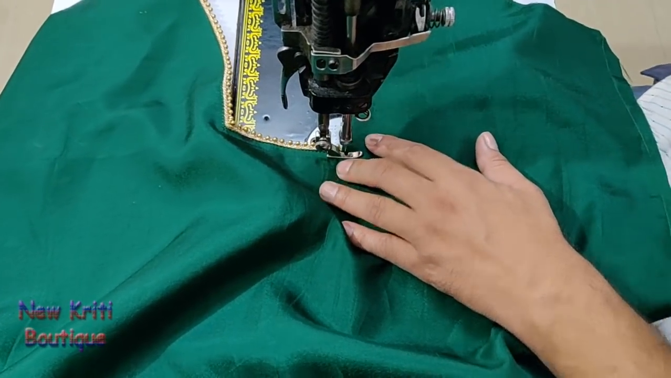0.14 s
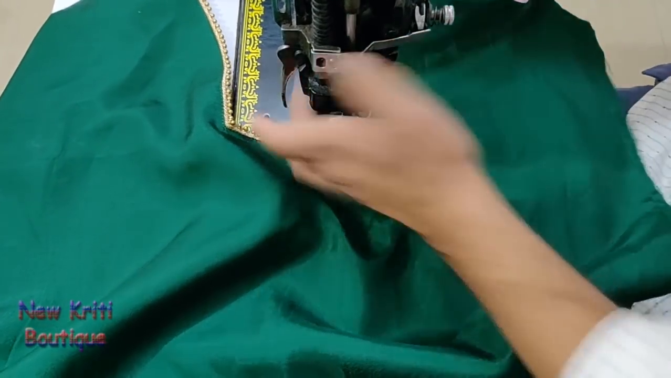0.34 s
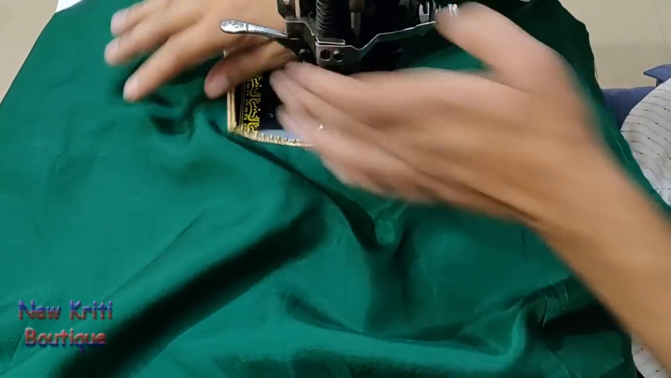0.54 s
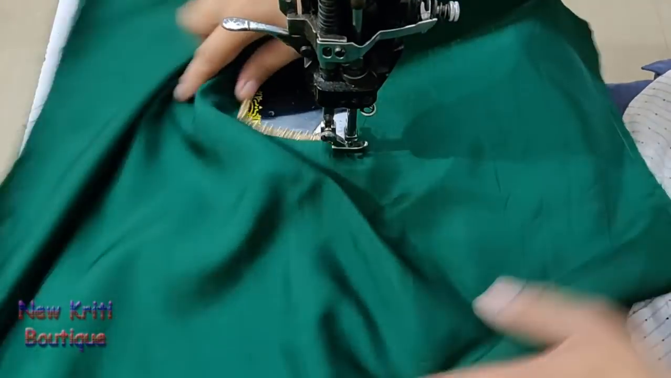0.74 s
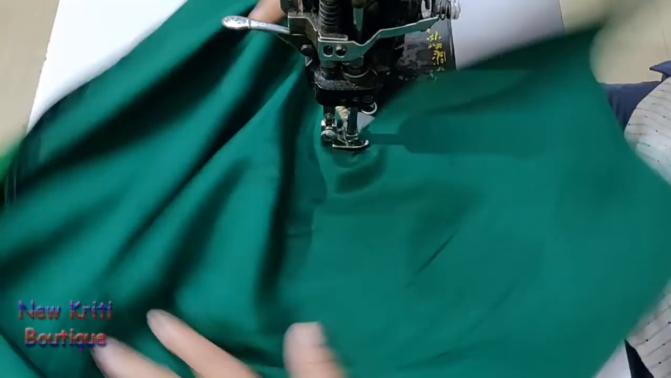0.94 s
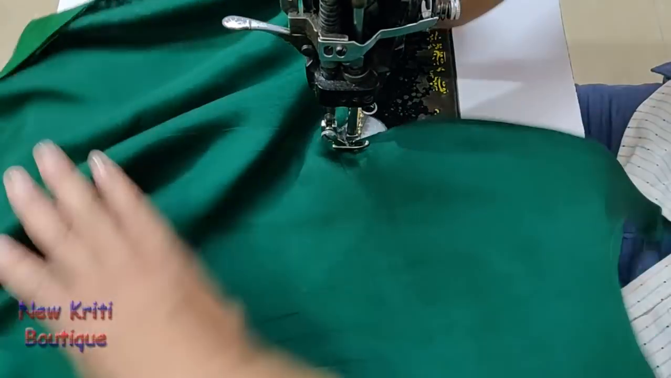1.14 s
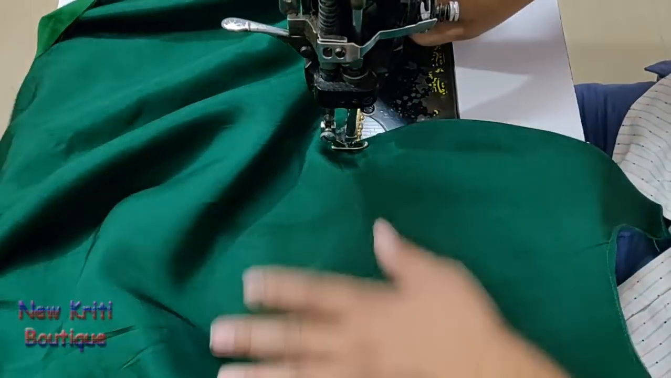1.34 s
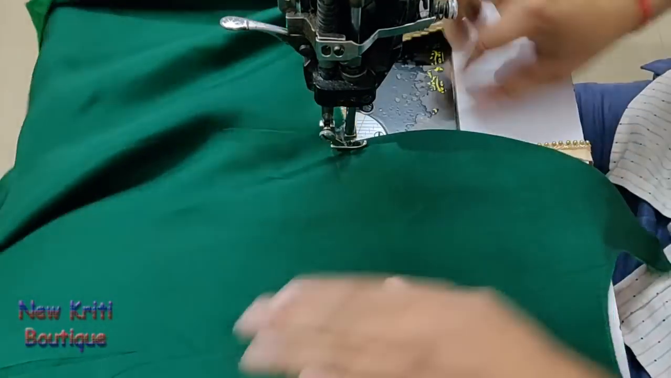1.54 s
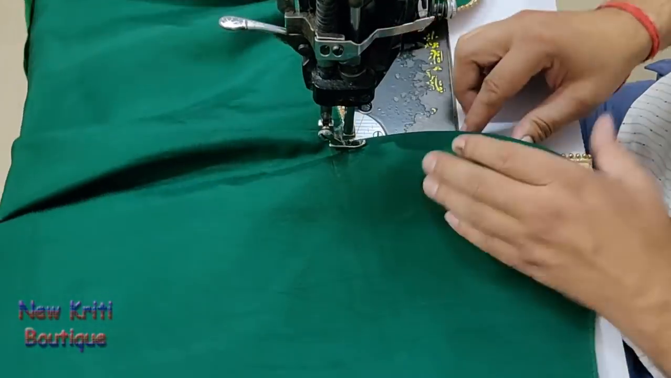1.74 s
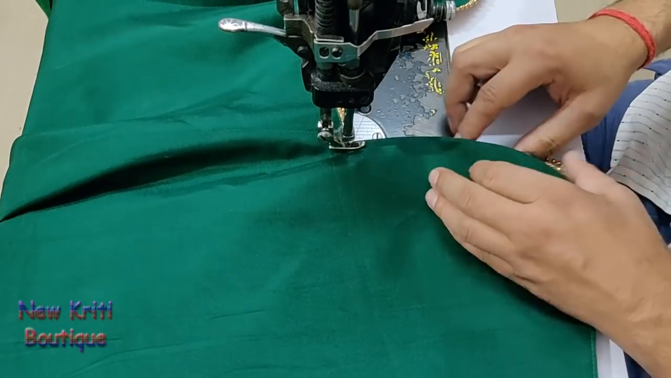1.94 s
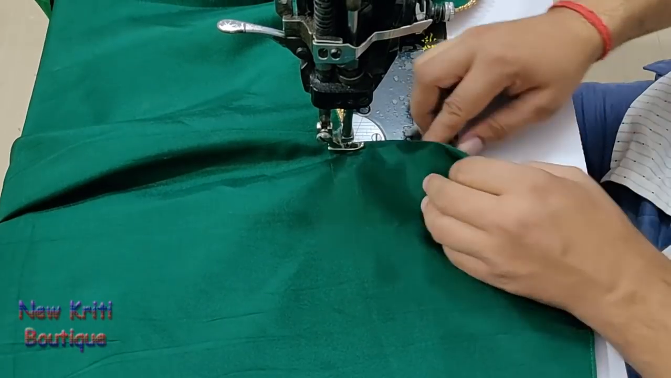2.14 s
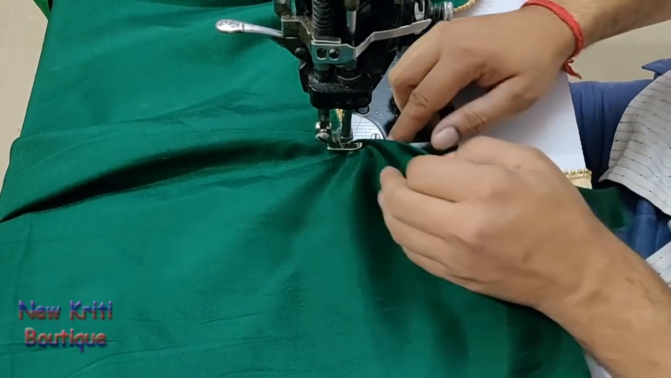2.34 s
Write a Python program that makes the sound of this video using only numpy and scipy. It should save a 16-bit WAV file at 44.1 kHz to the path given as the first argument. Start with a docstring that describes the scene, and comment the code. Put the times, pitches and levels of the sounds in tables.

```python
"""Sewing machine, cloth and hands

A sewing machine on a wooden table in a small room clacks: three steel strikes in quick succession.
Each strike is a noise crack and thud plus decaying sines for table, iron head and bump, and a room tail.
Hands bump table and machine (dulled noise bursts), slide the cloth (swelling noise) and move parts that
rub (narrow-band noise), click (bursts with a ping) and squeak (wavering sines). Faint room noise below."""
import sys
import numpy as np
from scipy import signal
from scipy.fft import rfft, irfft
from scipy.io import wavfile
from scipy.ndimage import uniform_filter1d

SR = 44100
rng = np.random.default_rng(int(sys.argv[2]) if len(sys.argv) > 2 else 0)


def persist_wave(psi):
    """Save psi, clipped to +-1, as 16-bit WAV."""
    counts = np.round(np.clip(psi, -1, 1) * 32767).astype(np.int16)
    wavfile.write(sys.argv[1], SR, np.atleast_2d(counts).T)


N = 110250
TIME_S = np.arange(N) / SR
BAND_EDGES_HZ = np.geomspace(30, 17000, 29)   # about third-octave

# Quiet room spectrum: freq_hz, density_db_per_hz
FLOOR_SPECTRUM = [(30, 13), (60, -25), (110, 5), (170, -2), (300, 0.5), (550, -11.5), (1000, -13.5),
                  (2000, -19.5), (4000, -25), (7000, -25), (11000, -26.5), (15000, -28)]
FLOOR_DB = -56.5
# Room decay: freq_hz, t60_s
ROOM_T60 = [(80, 0.53), (210, 0.96), (560, .44), (1470, 0.4), (3900, 0.27), (10000, 0.26), (16000, 0.15)]
ROOM_BUILD_S = 0.0024
# Left-right correlation of noise: freq_hz, correlation (no unit)
EAR_LIKENESS = [(25, -0.23), (80, 1), (330, 0.82), (700, 0.56), (1400, -0.19), (2800, 0.083), (6000, -.1),
                (14000, -0.02)]
PAN_CORNER_HZ = 7000

# Knocks: start_s, burst_db, hardness_cutoff_hz, table_ring_db, bass_cut_hz, room_db. Hands make all but the
# first, a faint blow of unknown source right at the start.
KNOCKS = [(0.001, -48, 596, -29.5, 176, -47), (0.5574, -29.5, 565, -11.5, 187, -37.5),
          (1.186, -40, 2950, -45, 99, -41.5), (1.1904, -29.5, 1620, -20, 59, -45),
          (1.194, -32.5, 3300, -18.5, 61, -32.5), (1.4009, -34, 1030, -16, 176, -32),
          (1.478, -54, 1500, -24, 160, -41.5), (1.638, -47, 420, -25, 169, -47),
          (2.401, -46.5, 810, -34, 300, -50)]
# Knock before the soft contact dulls it: freq_hz, density_db_per_hz
KNOCK_SPECTRUM = [(45, -40), (85, 9.5), (130, 8), (300, 7.5), (600, 3.5), (1000, 2), (2000, -1),
                  (4000, -11.5), (7000, 3.5), (15000, -12)]
KNOCK_T60_S = 0.042
# Wooden table modes: freq_hz, level_db, t60_s
TABLE_MODES = [(86, -40, .55), (182, -26, .56), (222, -32, .45), (295, -21, .38), (325, -23, .3),
               (350, -27, .28), (384.5, -22, .33), (442, -30, .42), (507, -29, .4), (554, -29, .45),
               (607, -26, .45)]

# Mechanism strikes: start_s, crack_db, thud_db, table_ring_db, iron_ring_db, room_db, pan_left_minus_right_db
CLACKS = [(0.1884, -52, -42.5, -16.5, -18, -35.5, -9), (0.2037, -18, -13, -1, -11, -24.5, -8),
          (0.2375, -15.5, -24, 1, 5, -16, -8)]
# Steel crack: freq_hz, density_db_per_hz
CRACK_SPECTRUM = [(100, -38), (500, -13.5), (1300, 9), (2500, -3.5), (4200, -6), (7000, -3), (9500, -9.5),
                  (12000, -9.5), (14500, 0), (17000, -7)]
# Thud: freq_hz, density_db_per_hz
THUD_SPECTRUM = [(25, -21), (45, -27), (60, -12), (85, -7), (125, -17), (200, -8), (350, 0), (650, -4),
                 (900, -26), (1300, -9), (2000, -13), (4500, -30.5), (7000, -24), (12000, -62)]
# Room answer to a clack: freq_hz, density_db_per_hz
CLACK_ROOM_SPECTRUM = [(45, -41), (130, -10.5), (200, -11.5), (340, -1), (560, -14.5), (850, -14),
                       (1350, -10), (2200, -16.5), (3500, -17.5), (7000, -20), (9000, -22.5),
                       (12000, -29.5), (14500, -16), (17000, -29)]
CRACK_T60_S, THUD_T60_S = 0.012, 0.18
# Iron head modes: freq_hz, level_db, t60_s
IRON_MODES = [(1042, -38, .3), (1108, -38, .25), (1301, -36, .3), (1332, -34, .3), (1394, -33, .33),
              (1712, -40, .24), (1898, -38, .24), (1927, -40, .24), (2990, -43, .18)]
# Heavy head rocking on the table: freq_hz, level_re_thud_db, t60_s
BUMP_MODES = [(77.4, -14.5, 0.3)]

# Cloth slides over the machine bed: fastest_s, rise_s, fall_s, level_db
SLIDES = [(0.64, 0.26, 0.19, -48.5), (0.901, 0.067, 0.24, -58), (1.378, 0.19, 0.27, -52),
          (1.902, 0.044, 0.097, -50), (2.161, 0.027, 0.029, -51)]
# Cloth hiss: freq_hz, density_db_per_hz
CLOTH_SPECTRUM = [(60, 5), (200, 17), (500, 16.5), (900, 7), (1800, 6.5), (3000, 1), (5800, 0), (7000, 7),
                  (8200, -3), (10000, -9), (12000, -5.5), (14500, 24), (17000, -63)]
CLOTH_GRAIN_DB, CLOTH_GRAINS_PER_S = 1, 120

# Moving parts rub: loudest_s, rise_s, fall_s, level_db, centre_hz, width_hz
RUBS = [(0.438, 0.02, 0.049, -44, 89, 20), (0.945, 0.0093, .02, -56.5, 860, 290),
        (1.08, .06, .07, -55, 135.3, 23), (1.24, 0.037, 0.093, -46.5, 86.3, 12),
        (1.432, 0.02, 0.11, -54.5, 82.6, 17), (1.46, 0.12, 0.16, -53.5, 970, 890),
        (1.5, 0.074, .07, -51, 803, 35), (1.83, 0.016, 0.037, -54.5, 276, 150)]

# Small steel clicks: start_s, click_db, ping_db, ping_hz, room_db, pan_left_minus_right_db
TICKS = [(0.4205, -58, -46, 6700, -61, -8), (1.196, -52.5, -51, 6400, -53, -3),
         (1.4023, -58, -50, 5360, -67, -7), (1.515, -38.5, -40, 6350, -38, -5),
         (1.6153, -54.5, -42.5, 8400, -58, -10), (1.7703, -58, -43, 7250, -52, -6),
         (2.0238, -52, -51, 7800, -48, -5), (2.131, -54.5, -64, 8100, -52, -6),
         (2.147, -62, -64, 7500, -61, 3), (2.439, -61.5, -64, 4200, -58.5, 0)]
# Steel click: freq_hz, density_db_per_hz
TICK_SPECTRUM = [(200, -30), (1200, -2.5), (3000, -2), (5500, -5), (6900, 5), (9200, -5), (10500, -1),
                 (12300, -5.5), (14500, 3), (17000, -15)]
TICK_T60_S, PING_T60_S = 0.0084, 0.02

# Metal-on-metal squeaks: loudest_s, rise_s, level_db, pitch_hz, t60_s
SQUEAKS = [(1.467, 0.02, -48.5, 2223, 0.84), (1.91, 0.017, -61, 2470, 0.13)]
SQUEAK_RISE_HZ_PER_S = 430
SQUEAK_WAVER_HZ, SQUEAK_WAVERS_PER_S, SQUEAK_FLUTTER_DB = 60, 220, 3

PEAK_LIMIT, CUTOFF_HZ = 0.69, 15900


def from_db(db):
    """Decibels to gain."""
    return 10 ** (np.asarray(db) / 20)


def at_hz(points, hz):
    """Interpolate a table on a log-frequency axis."""
    table_hz, value = np.transpose(points)
    return np.interp(np.log(hz), np.log(table_hz), value)


def decay(t60_s, length_s):
    """Exponential envelope, 60 dB down at t60_s."""
    return np.exp(-np.log(1000) * TIME_S[:int(length_s * SR)] / t60_s) + 1e-12


def swell(peak_s, rise_s, fall_s):
    """Gaussian movement with separate rise and fall widths, 1 at peak_s."""
    width_s = np.where(TIME_S < peak_s, rise_s, fall_s)
    return np.exp(-.5 * ((TIME_S - peak_s) / width_s) ** 2)


def wobble(rate_per_s):
    """Random values, rate_per_s of them a second, joined by straight lines."""
    return np.interp(TIME_S * rate_per_s, np.arange(N), rng.standard_normal(N))


def filtered(x, hz, kind, order=2):
    """Butterworth filter."""
    corner_hz = np.clip(hz, 10, .48 * SR)
    return signal.sosfilt(signal.butter(order, corner_hz, kind, fs=SR, output="sos"), x)


def blow_level(x):
    """Scale a stereo blow to the energy of 10 ms at rms 1."""
    return x * np.sqrt(2 * SR / 100 / np.sum(x ** 2))


def panned(x, left_minus_right_db):
    """Weight the treble between the ears; bass stays central."""
    ear_db = [[left_minus_right_db / 2], [-left_minus_right_db / 2]]
    treble = filtered(x, PAN_CORNER_HZ, "high", order=1)
    return x + treble * (from_db(ear_db) - 1)


def add(out, start_s, x):
    """Mix x into out from start_s."""
    start = max(int(start_s * SR), 0)
    out[:, start:start + x.shape[-1]] += x[..., :N - start]


def band(envelope, low_hz, high_hz):
    """One band of enveloped stereo noise, rms 1, with the ear correlation of its centre."""
    pair = filtered(rng.standard_normal((2, len(envelope))) * envelope, [low_hz, high_hz], "band")
    mid, side = pair / np.sqrt(np.mean(pair ** 2, axis=1, keepdims=True))
    alike = np.clip(at_hz(EAR_LIKENESS, np.sqrt(low_hz * high_hz)), -.99, .99)
    return np.sqrt((1 + alike) / 2) * mid + np.sqrt((1 - alike) / 2) * side * [[1], [-1]]


def coloured(spectrum, envelope_at):
    """Sum of noise bands, each under the envelope for its frequency; rms 1."""
    out = 0
    for low_hz, high_hz in zip(BAND_EDGES_HZ, BAND_EDGES_HZ[1:]):
        centre_hz = np.sqrt(low_hz * high_hz)
        gain = from_db(at_hz(spectrum, centre_hz)) * np.sqrt(high_hz - low_hz)
        out = out + gain * band(envelope_at(centre_hz), low_hz, high_hz)
    return out / np.sqrt(np.mean(out ** 2))


def steady(hz):
    """Flat envelope at every frequency."""
    return np.ones(N)


def causal(log_gain):
    """Minimum-phase response with this gain: nothing sounds early."""
    cepstrum = irfft(log_gain)
    half = len(cepstrum) // 2
    return np.exp(rfft(np.r_[cepstrum[0], 2 * cepstrum[1:half], np.zeros(half)]))


def burst(spectrum, t60_s, size=8192):
    """Dense damped contact modes: dying noise, evened out and given the body's colour."""
    hz = np.maximum(np.arange(size // 2 + 1) * SR / size, 1)
    alike = np.clip(at_hz(EAR_LIKENESS, hz), -.995, .995)
    noise_pair = rfft(rng.standard_normal((2, size)) * decay(t60_s, 1)[:size])
    mid, side = noise_pair * np.sqrt([1 + alike, 1 - alike])
    target = from_db(at_hz(spectrum, hz))
    ears = []
    for noise in (mid + side, mid - side):
        power = uniform_filter1d(np.abs(noise) ** 2, size=70)
        ears.append(irfft(noise * causal(np.log(target / np.sqrt(power)))))
    return blow_level(np.array(ears))


def ringing(modes):
    """A body's modes after a unit blow: decaying sines of alternating sign."""
    out = 0
    for k, (hz, db, t60_s) in enumerate(modes):
        out = out + (-1) ** k * from_db(db) * decay(t60_s, 1) * np.sin(2 * np.pi * hz * TIME_S[:SR])
    return out


def room_tail(spectrum):
    """Room answer to a blow: builds up quickly, then each band dies at its own rate."""
    length_s = .7
    build = 1 - np.exp(-TIME_S[:int(length_s * SR)] / ROOM_BUILD_S)
    return blow_level(coloured(spectrum, lambda hz: build * decay(at_hz(ROOM_T60, hz), length_s)))


def room_floor():
    """Steady coloured noise of the quiet room."""
    return from_db(FLOOR_DB) * coloured(FLOOR_SPECTRUM, steady)


def knocks(table_ring):
    """Softer contacts on the table: the softer, the lower the treble cut-off."""
    out = np.zeros((2, N))
    for start_s, db, hard_hz, ring_db, bass_hz, room_db in KNOCKS:
        def soften(x):
            dulled = filtered(x, hard_hz, "low", order=3)
            return filtered(dulled, bass_hz, "high")
        add(out, start_s, from_db(db) * blow_level(soften(burst(KNOCK_SPECTRUM, KNOCK_T60_S))))
        add(out, start_s, from_db(ring_db) * soften(table_ring))
        add(out, start_s, from_db(room_db) * blow_level(soften(room_tail(KNOCK_SPECTRUM))))
    return out


def clacks(table_ring):
    """Steel hits steel: a new crack per strike; thud, rings and room answer repeat at set levels."""
    out = np.zeros((2, N))
    iron_ring, bump = ringing(IRON_MODES), ringing(BUMP_MODES)
    thud, room = burst(THUD_SPECTRUM, THUD_T60_S), room_tail(CLACK_ROOM_SPECTRUM)
    for start_s, crack_db, thud_db, ring_db, iron_db, room_db, pan_db in CLACKS:
        crack = burst(CRACK_SPECTRUM, CRACK_T60_S)
        add(out, start_s, from_db(crack_db) * panned(crack, pan_db))
        add(out, start_s, from_db(thud_db) * (thud))
        add(out, start_s, from_db(thud_db) * bump)
        add(out, start_s, from_db(ring_db) * table_ring)
        add(out, start_s, from_db(iron_db) * iron_ring)
        add(out, start_s, from_db(room_db) * room)
    return out


def cloth():
    """Fabric hisses with the speed of each slide, catching a little as it goes."""
    power = sum((from_db(db) * swell(s, rise_s, fall_s)) ** 2 for s, rise_s, fall_s, db in SLIDES)
    grain = from_db(CLOTH_GRAIN_DB * wobble(CLOTH_GRAINS_PER_S))
    return np.sqrt(power) * grain * coloured(CLOTH_SPECTRUM, steady)


def rubs():
    """Friction excites one resonance of each moving part: swelling narrow-band noise."""
    out = np.zeros((2, N))
    for peak_s, rise_s, fall_s, db, hz, width_hz in RUBS:
        resonance = band(np.ones(N), hz - width_hz / 2, hz + width_hz / 2)
        out += from_db(db) * swell(peak_s, rise_s, fall_s) * resonance
    return out


def ticks():
    """Light steel clicks: short bursts, each with a high decaying sine and a room tail."""
    out = np.zeros((2, N))
    envelope = decay(PING_T60_S, .1)
    for start_s, db, ping_db, ping_hz, room_db, pan_db in TICKS:
        ping = envelope * np.sin(2 * np.pi * ping_hz * TIME_S[:len(envelope)])
        add(out, start_s, from_db(db) * panned(burst(TICK_SPECTRUM, TICK_T60_S), pan_db))
        add(out, start_s, from_db(ping_db) * panned(ping, pan_db))
        add(out, start_s, from_db(room_db) * room_tail(TICK_SPECTRUM))
    return out


def squeaks():
    """Metal on metal: a wavering sine swells, then climbs in pitch as it dies away."""
    out = np.zeros(N)
    for peak_s, rise_s, db, hz, t60_s in SQUEAKS:
        after_s = np.maximum(TIME_S - peak_s, 0)
        flutter_db = SQUEAK_FLUTTER_DB * wobble(SQUEAK_WAVERS_PER_S)
        fade = np.exp(-np.log(1000) * after_s / t60_s)
        level = from_db(db + flutter_db) * swell(peak_s, rise_s, np.inf) * fade
        waver_hz = SQUEAK_WAVER_HZ * wobble(SQUEAK_WAVERS_PER_S)
        pitch_hz = hz + SQUEAK_RISE_HZ_PER_S * after_s + waver_hz
        out += level * np.sin(2 * np.pi * np.cumsum(pitch_hz) / SR)
    return out


def scene():
    """Machine, hands and cloth over the quiet room."""
    table_ring = ringing(TABLE_MODES)
    blows = knocks(table_ring) + clacks(table_ring) + ticks()
    return room_floor() + blows + cloth() + rubs() + squeaks()


def record(dry):
    """Round the peaks with tanh, then cut the top steeply."""
    rounded = PEAK_LIMIT * np.tanh(dry / PEAK_LIMIT)
    return signal.sosfilt(signal.ellip(10, .2, 80, CUTOFF_HZ, fs=SR, output="sos"), rounded)


dry = scene()
out = record(dry)
persist_wave(out)
```